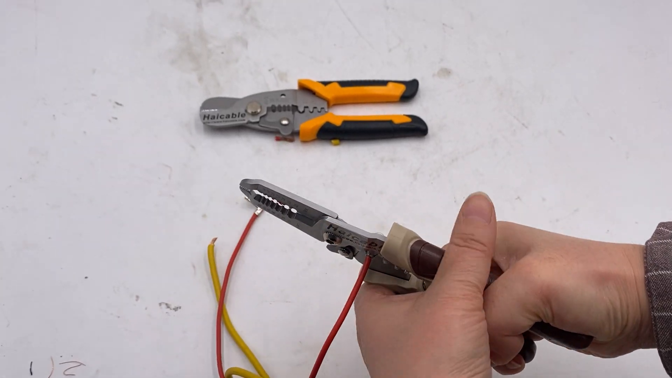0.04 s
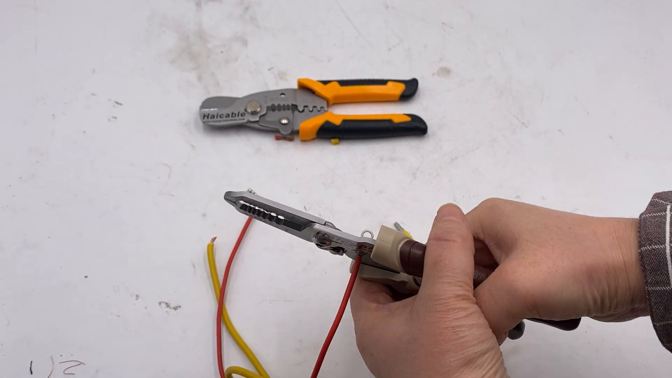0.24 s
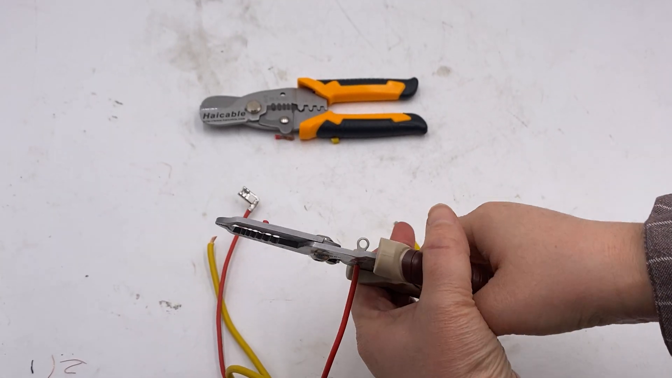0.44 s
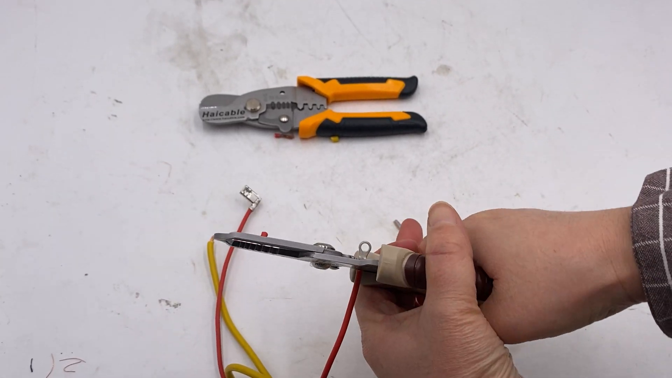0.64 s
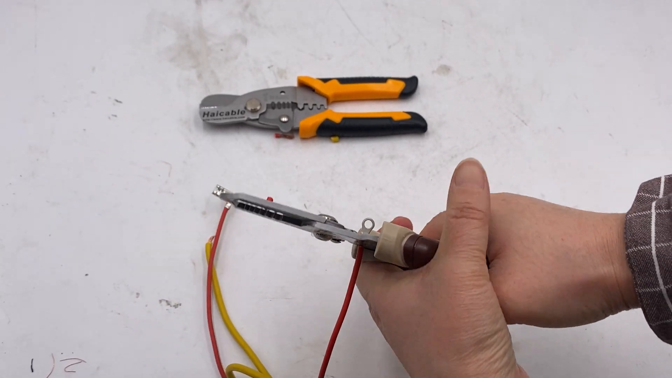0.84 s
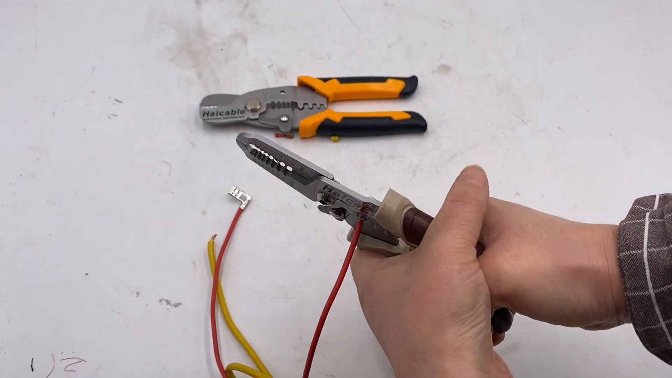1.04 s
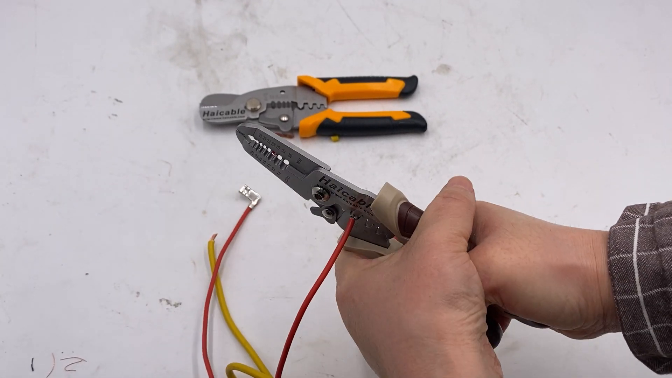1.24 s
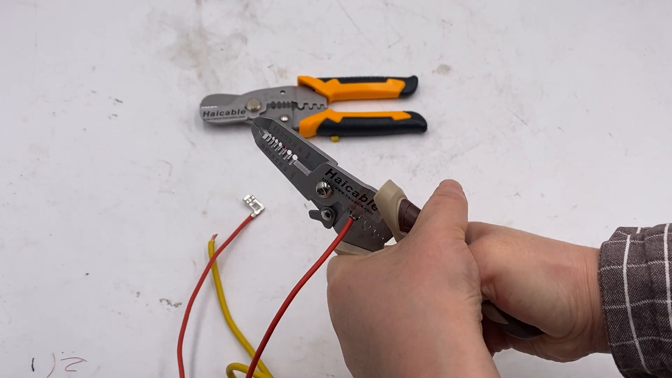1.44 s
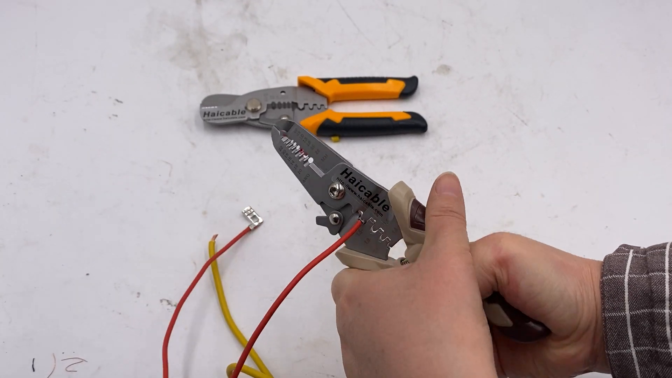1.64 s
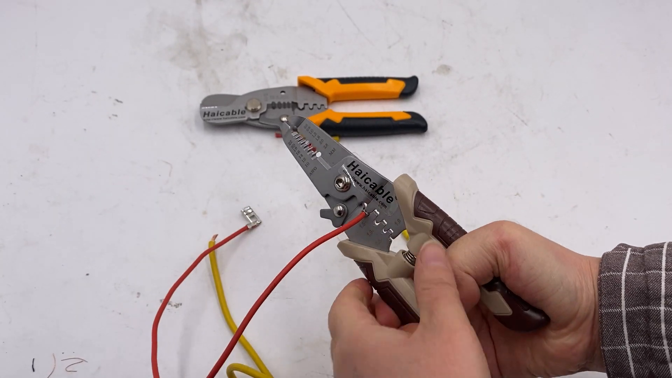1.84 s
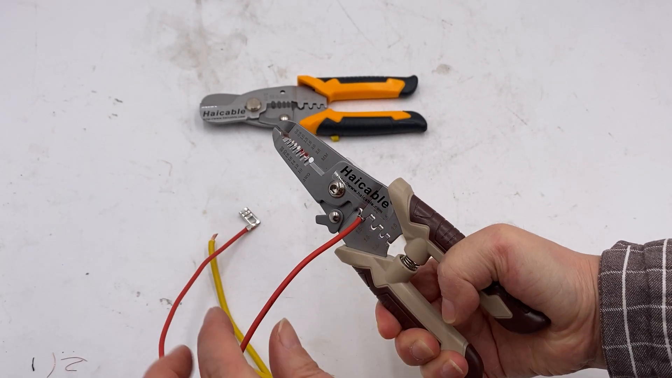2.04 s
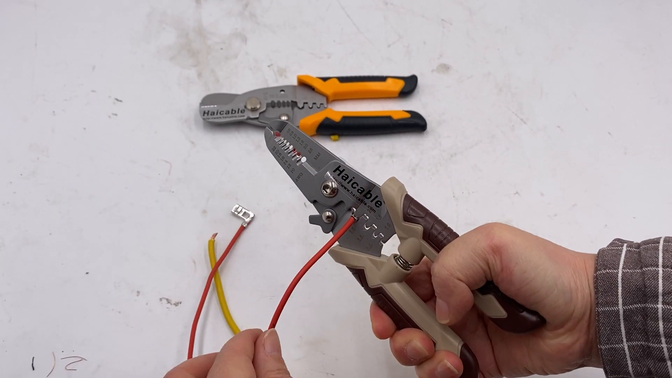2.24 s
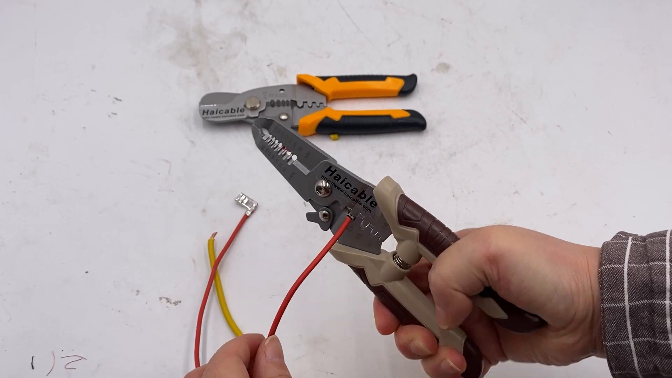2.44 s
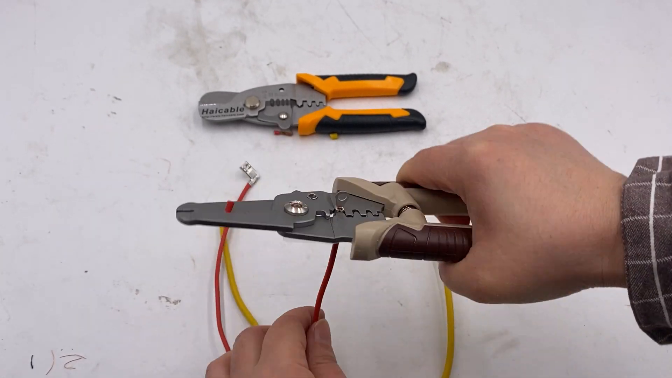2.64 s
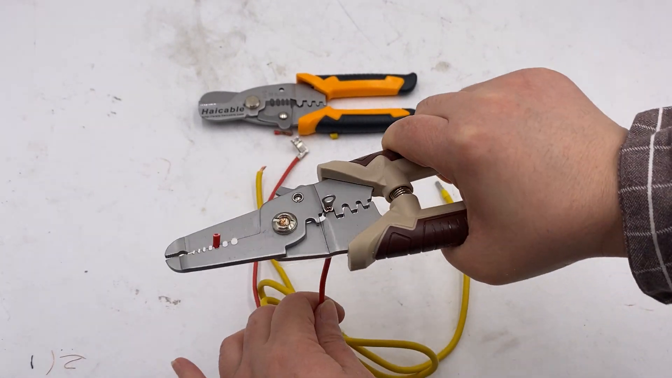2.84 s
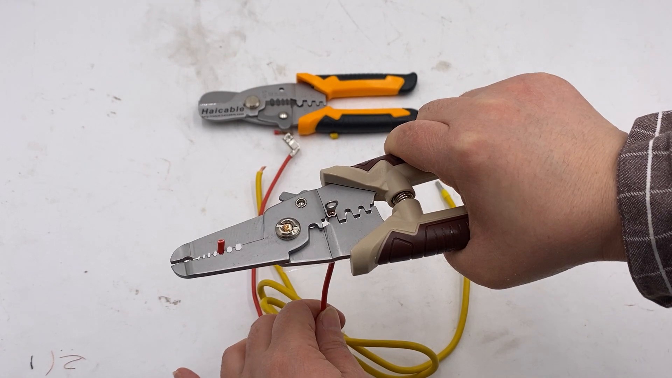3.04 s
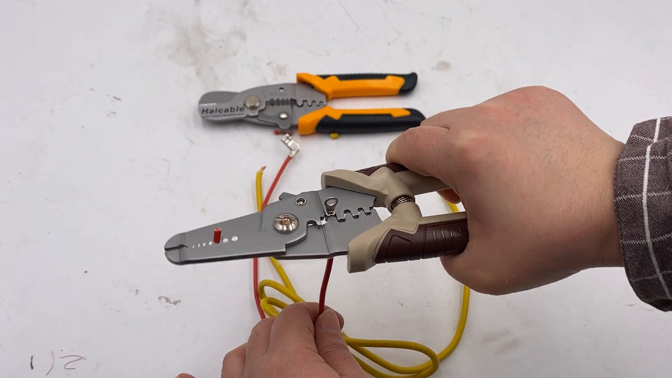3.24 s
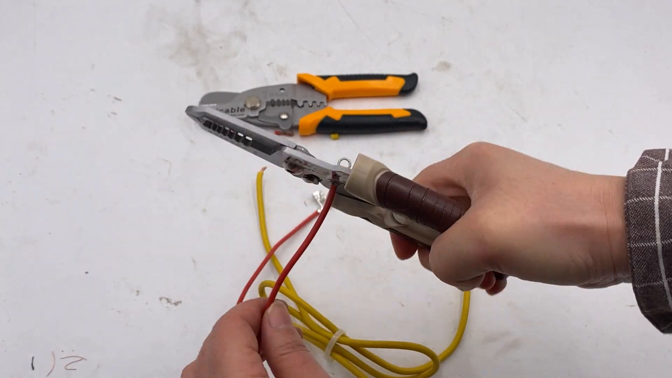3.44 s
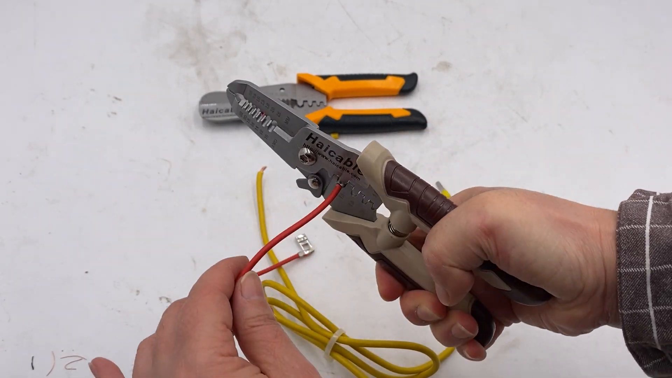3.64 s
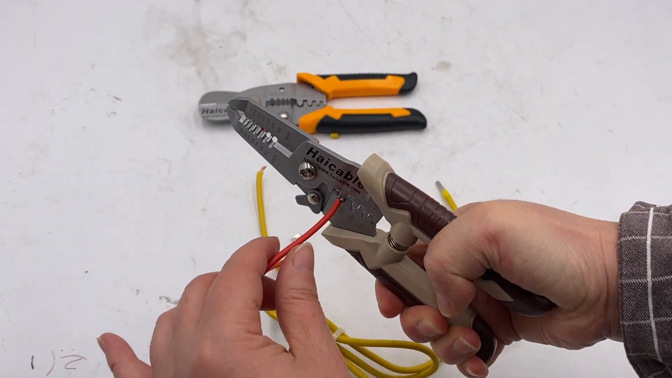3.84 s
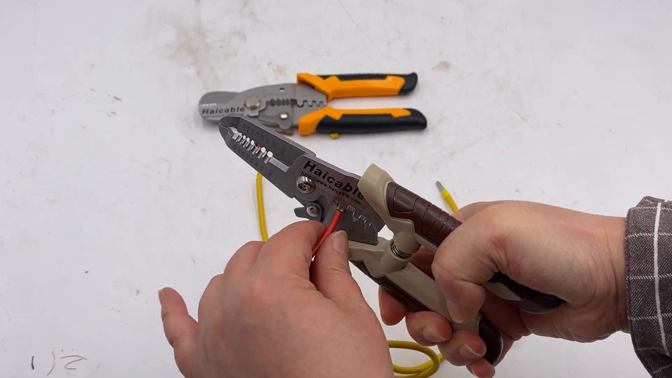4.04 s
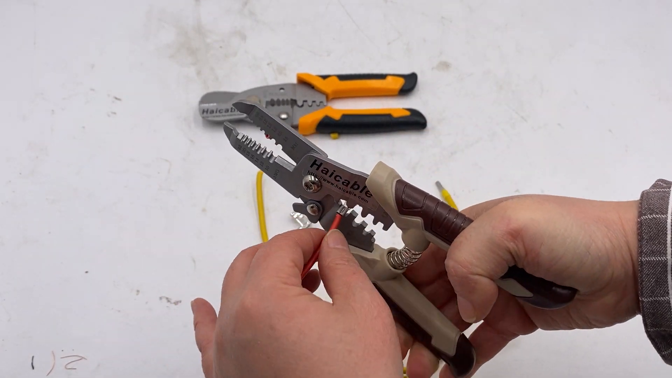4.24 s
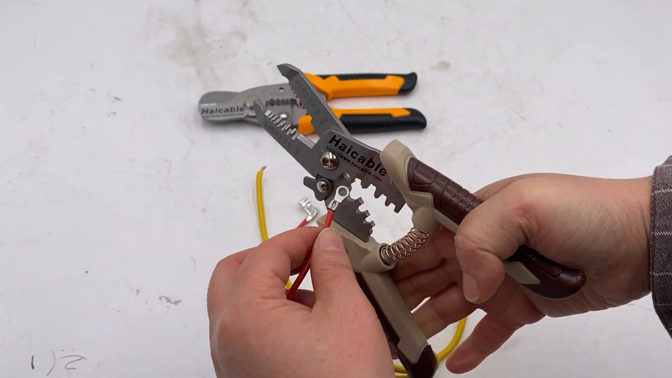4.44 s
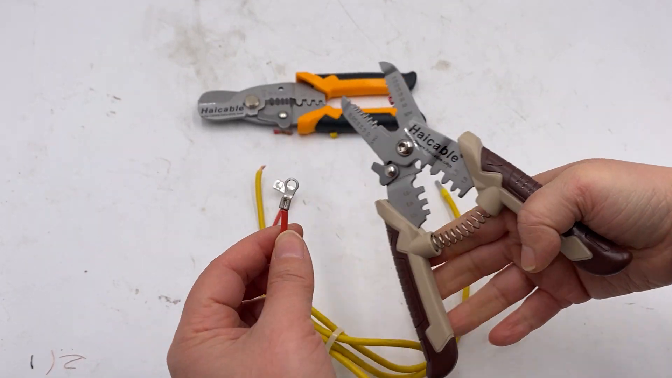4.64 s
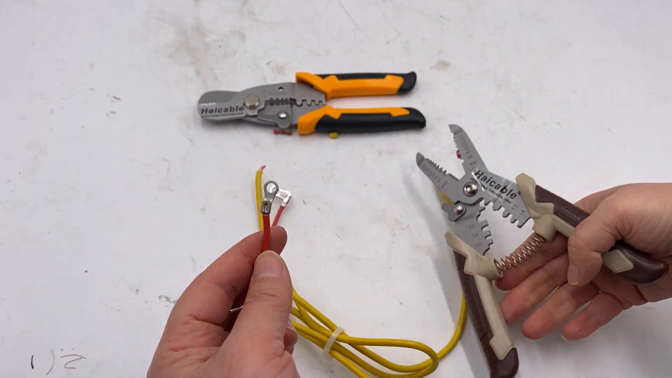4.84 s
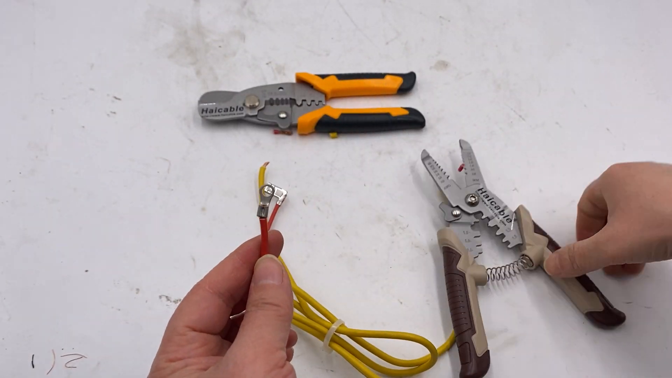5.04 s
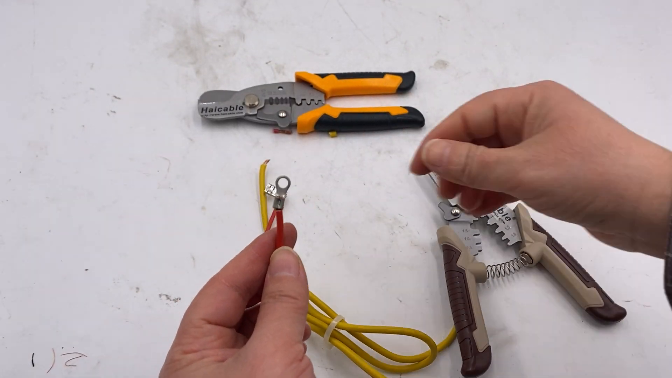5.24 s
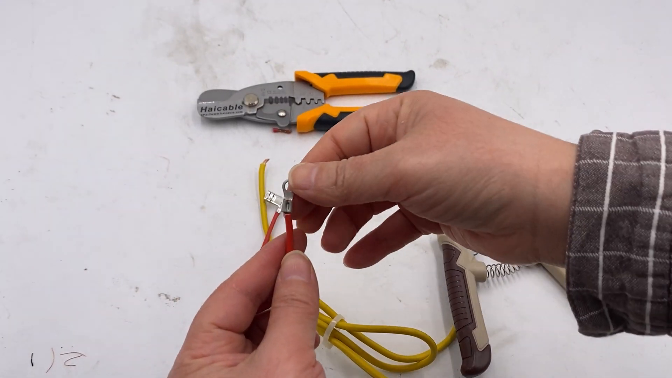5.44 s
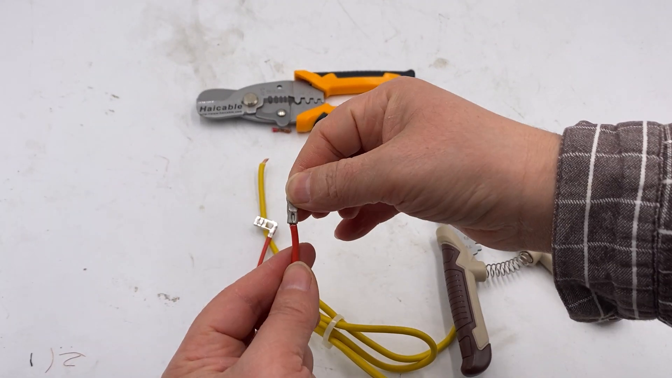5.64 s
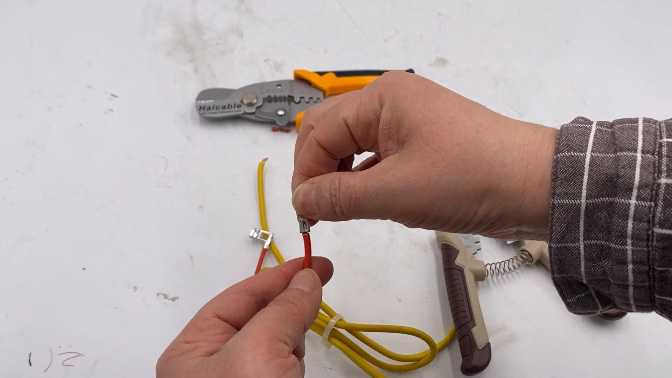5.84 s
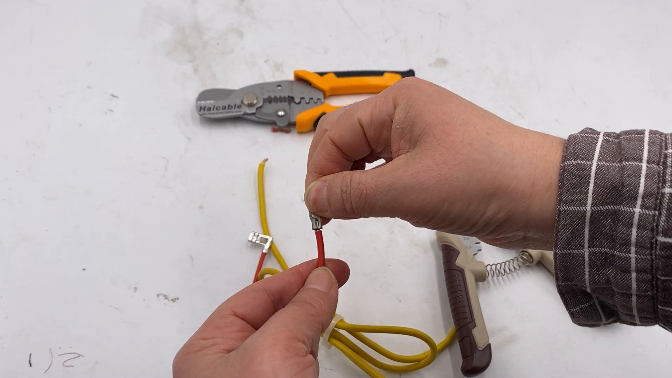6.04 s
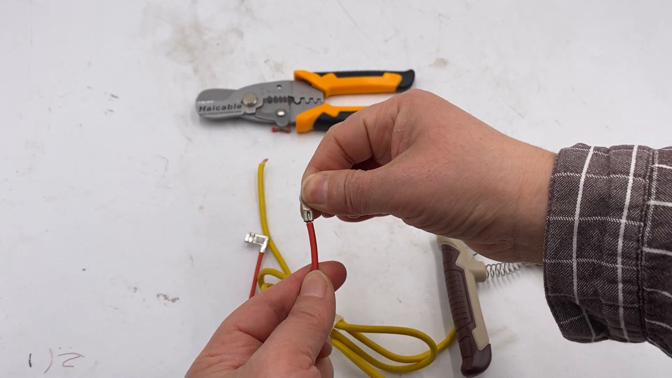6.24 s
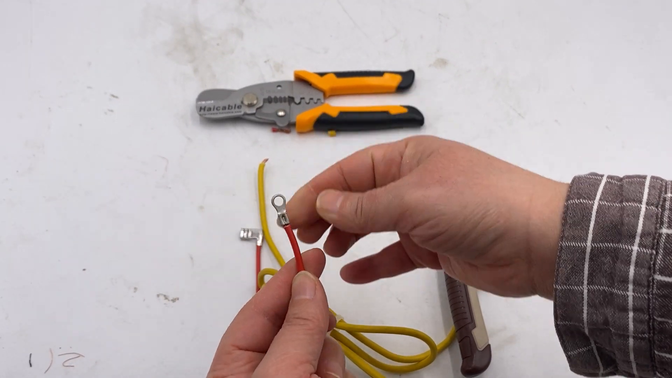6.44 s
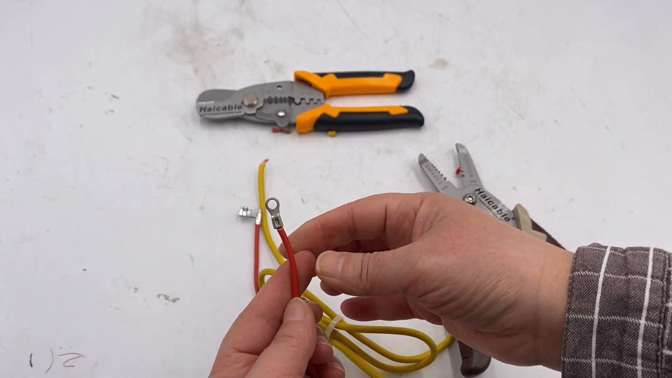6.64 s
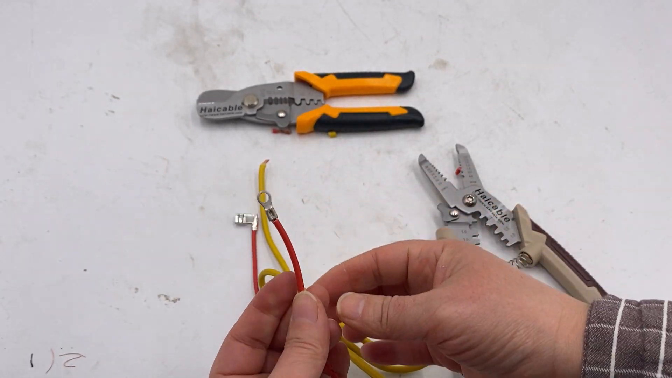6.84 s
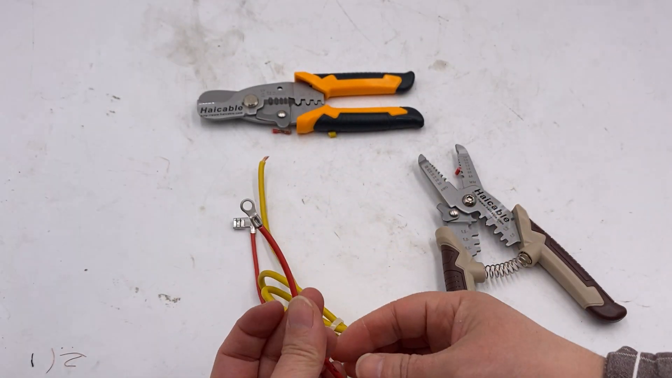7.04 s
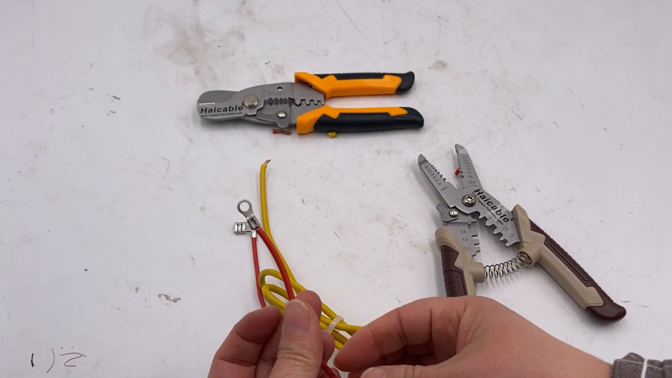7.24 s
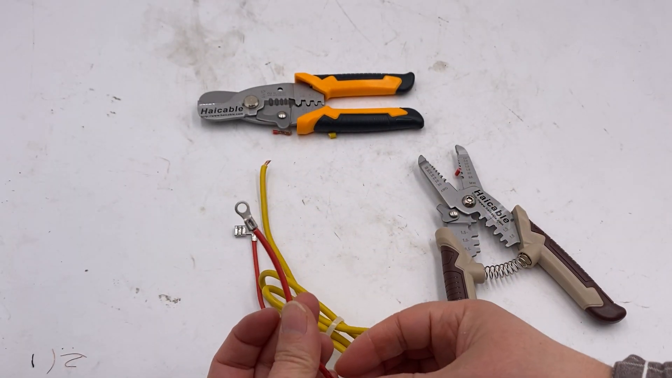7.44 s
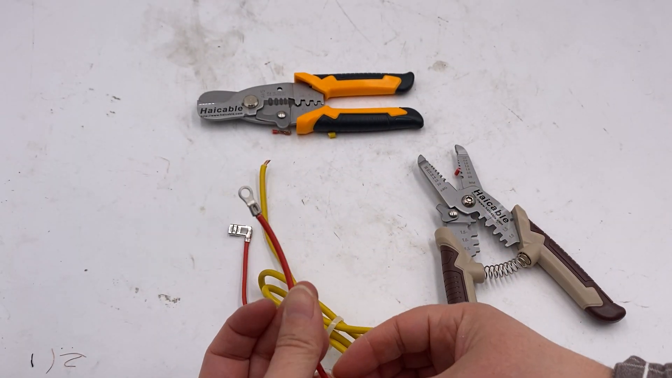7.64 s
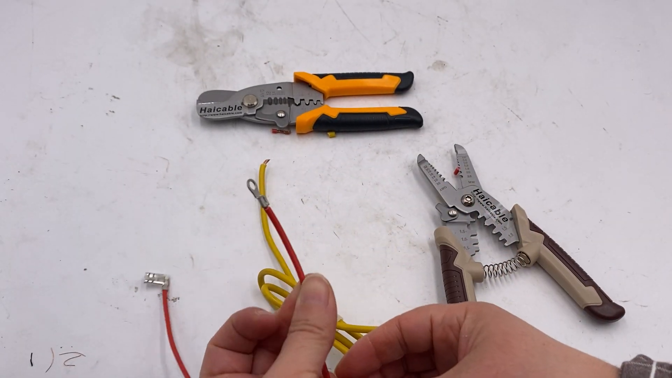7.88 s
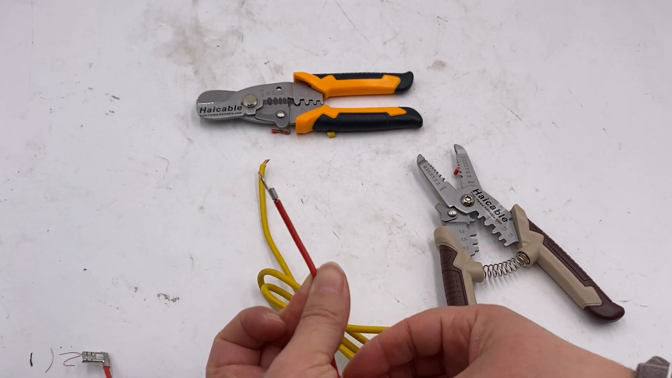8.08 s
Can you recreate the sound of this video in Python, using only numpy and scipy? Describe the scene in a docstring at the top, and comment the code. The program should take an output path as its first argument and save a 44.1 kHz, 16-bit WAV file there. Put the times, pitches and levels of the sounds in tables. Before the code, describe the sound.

A wire tool is handled close to the microphone: sparse clicks, faint sleeve hiss, squeaky stick-slip rubbing and two stronger rasps as it turns on the lead. Around the middle it hits the tabletop with woody thumps and sharp steel rattling, by far the loudest event. Afterwards come only quiet touches and ticks, then a brief dragging scrape of the lead, over a constant dull air rumble with a short room tail.

```python
"""Wire stripper over a workbench

Hands work a steel wire stripper on a lead, heard close by in a small room with rumbling ventilation.
Stick-slip friction, filtered by resonances, makes the rubbing of fingers and sleeve, the spring and the
dragged lead. Impulses through resonances and spectra tick the jaws and terminal. The dropped tool knocks,
bounces and rattles as sums of decaying modes with noisy scatter; at the end the lead is dragged away."""
import sys
import numpy as np
from scipy import signal
from scipy.fft import rfft, irfft, next_fast_len
from scipy.io import wavfile

SR = 44100
rng = np.random.default_rng(int(sys.argv[2]) if len(sys.argv) > 2 else 0)


def wrap_up_sound(samples):
    """Save the sound to the file named by the first command line argument, as 16-bit audio."""
    columns = np.atleast_2d(samples).T
    # keep every value between -1 and 1, then stretch to whole-number steps
    tamed = np.clip(columns, -1, 1)
    steps = np.round(tamed * 32767).astype(np.int16)
    wavfile.write(sys.argv[1], SR, steps)


N = 357651  # samples

# Levels in the tables are relative: each source sets its own final gain.
# ventilation spectrum: f/Hz, density level/dB
VENT_SPECTRUM = [(20, -47.5), (46, -2), (77, -9), (113, -5.5), (154, -16), (285, -13.5), (400, -21),
                 (800, -26), (1370, -37.5), (2320, -45), (3500, -53), (14000, -59), (16000, -80.5)]
# stereo width of the field: f/Hz, side over mid level/dB
STEREO_WIDTH = [(60, -18), (120, -18), (220, -7.5), (600, 0.5), (1300, -1.5), (2400, -6.5), (4400, 1),
                (7500, -4), (9200, 24.5), (11000, -13.5), (15000, 5.5)]
# decay of the room's tail: f/Hz, t60/s
ROOM_DECAY = [(100, 0.77), (500, 0.35), (3000, 0.24), (12000, 0.13)]
# fingers shifting on the grips: start t/s, length t/s, level/dB
FINGER_RUBS = [(0, 0.07, -62.5), (1.13, 0.11, -55), (1.405, 0.17, -54), (1.542, 0.069, -46),
               (1.698, 0.037, -54), (1.89, 0.038, -57.5), (1.985, 0.053, -63.5), (2.208, 0.023, -38.5),
               (2.24, 0.035, -50), (2.315, 0.086, -63), (2.452, 0.14, -49.5), (2.498, 0.015, -40),
               (2.528, 0.014, -37.5), (3.892, 0.025, -60.5), (4.36, 0.043, -47), (5.62, 0.4, -78),
               (6.435, 0.088, -54), (6.555, 0.051, -64), (6.865, 0.083, -57), (7.255, 0.054, -61.5)]
# soft hiss strokes (sleeve swishes, the hiss of a strong rub, the fading of a bright tick):
# start t/s, length t/s, level/dB
SOFT_HISSES = [(.66, 0.11, -74.5), (.86, 0.099, -74.5), (1.42, 0.68, -77.5), (2.21, .03, -56),
               (2.868, 0.06, -60.5), (4.31, 0.19, -70), (6.555, .05, -69), (6.65, 0.088, -68),
               (6.86, 0.112, -70)]
# three long slides (tool twisted round the lead, twisted back, hands drawing the lead away),
# each a list of: t/s, rasp level/dB, hiss level/dB
LONG_SLIDES = [
    [(2.655, -58.5, -59), (2.671, -50.5, -60.5), (2.693, -39.5, -51.5), (2.723, -39.5, -54),
     (2.737, -65, -53.5), (2.773, -46.5, -55), (2.805, -54.5, -55), (2.865, -65.5, -76)],
    [(3.43, -63.5, -72), (3.44, -45.5, -52.5), (3.512, -38, -45.5), (3.544, -34, -46), (3.582, -46, -58.5),
     (3.626, -46.5, -56.5), (3.7, -83, -86.5)],
    [(7.61, -69.5, -87), (7.728, -58.5, -73.5), (7.742, -47, -64), (7.81, -47, -50.5), (7.832, -37, -48.5),
     (8.01, -62, -49.5), (8.04, -75, -64), (8.064, -51.5, -60.5), (8.11, -61.5, -72)],
]
# resonances of the rubbed tool: f/Hz, width f/Hz, level/dB
GRIP_RESONANCES = [(1465, 160, -18.5), (1854, 81, -10), (2243, 125, 2), (2367, 250, -2.5), (2675, 110, -8),
                   (3015, 460, -17.5)]
# friction hiss spectrum: f/Hz, density level/dB
HISS_SPECTRUM = [(300, -36), (800, -7), (1400, -5.5), (2200, -3.5), (4000, 2.5), (7000, -1), (9300, -6),
                 (11000, -7), (14000, -7.5), (15500, -30)]
# dull clicks of the grips in the hand: t/s, level/dB
GRIP_CLICKS = [(.1211, -27), (1.0006, -22.5), (1.5482, -30), (1.7025, -37.5), (1.8003, -40.5),
               (2.2144, -21.5), (2.6249, -20), (2.6484, -22.5), (3.4394, -20), (3.787, -42), (4.3635, -30),
               (5.657, -45), (6.3539, -25), (6.7181, -36), (6.8284, -31.5)]
# bright ticks of jaws and terminal: t/s, level/dB
BRIGHT_TICKS = [(.2775, -58), (.365, -53), (.3785, -41.5), (.414, -53), (.4479, -55), (.8604, -50),
                (2.5795, -48.5), (2.875, -34.5), (4.244, -58), (4.265, -56.5), (5.3902, -51.5), (5.53, -65),
                (6.3539, -37.5)]
# lead sliding over the bench: start t/s, length t/s, level/dB
LEAD_DRAGS = [(2.68, 0.051, -46.5), (3.497, .05, -44.5), (4.364, 0.031, -54.5), (6.35, 0.028, -51),
              (6.56, 0.029, -61), (6.655, 0.08, -65), (7.83, 0.16, -41), (7.955, 0.076, -35.5)]
# resonances of the dragged lead: f/Hz, width f/Hz, level/dB
SCRAPE_RESONANCES = [(3600, 290, 2.5), (4440, 550, -9.5)]
# modes of the terminal's tap: f/Hz, level/dB, t60/s
TERMINAL_MODES = [(730, -43, 0.026), (1076, -39.5, 0.017), (1660, -47, 0.037), (2820, -44.5, .014)]
# modes of the lead's freed end: f/Hz, level/dB, t60/s
PLUCK_MODES = [(510, -39.5, .055), (2656, -45, 0.14)]
# coil spring sliding as the jaws open: start t/s, length t/s, level/dB
JAW_OPENINGS = [(4.59, .22, -73)]
# resonance of the coil: f/Hz, width f/Hz, level/dB
COIL_RESONANCE = [(2620, 440, 0)]
# steel contacts of the bouncing tool, each on another part:
# t/s, crack level/dB, ping of that part f/Hz, ping level/dB
STEEL_CLASHES = [(4.9316, -28.5, 2520, -49.5), (4.9447, -24.5, 4980, -34), (4.9905, -44, 5150, -46.5),
                 (5.061, -24, 6070, -41.5), (5.097, -15, 3085, -30), (5.1095, -16, 12960, -27.5),
                 (5.148, -29.5, 6000, -38), (5.1998, -19, 2720, -32), (5.2166, -24.5, 5740, -26),
                 (5.2667, -39, 5050, -43.5), (5.2793, -30, 5570, -42), (5.303, -25.5, 4100, -42),
                 (5.327, -35, 3580, -46.5)]
# steel contact spectrum: f/Hz, density level/dB
STEEL_SPECTRUM = [(300, -14.5), (1300, -3), (2800, 2), (6000, -1), (7500, -7.5), (10500, -11),
                  (13500, -11.5), (16000, -20.5)]
# modes of the steel jaws: f/Hz, level/dB, t60/s
JAW_MODES = [(2120, 2.5, 0.064), (3058, -2, 0.076), (4107, -6, .12), (7200, -7, 0.18), (12510, -11.5, .1)]
# blows on the bench: t/s, thump level/dB, clack level/dB
BENCH_KNOCKS = [(4.945, -19.5, -39), (5.062, -25.5, -53), (5.0986, -12.5, -14), (5.1102, -25.5, -15),
                (5.203, -16, -18.5), (5.286, -21, -42), (5.307, -21, -29), (5.4, -37.5, -59.5)]
# modes of the bench top: f/Hz, level/dB, t60/s
BENCH_MODES = [(67, 5, 0.1), (102, 1.5, 0.12), (123, 2.5, 0.21), (187, -3, 0.099), (262.4, -7, 0.17),
               (294, -7.5, 0.15), (343.8, -10.5, 0.12), (433, -11, 0.16), (670, -3, 0.11),
               (743.6, 5, 0.042), (842, 7, 0.044), (909, 2.5, 0.1), (996, -3.5, 0.11), (1195, -15, 0.07),
               (1365, -15.5, 0.05), (1620, -8, 0.04)]

TOP_HZ = 15950
VENT_LEFT_DB = 0.33  # left raised and right lowered by this
# where in its length a stroke crests; how far below the crest its nominal start and end lie
CREST_SHARE, STROKE_EDGE_DB = 0.46, 14
RUB_HISS_DB = -16.5  # hiss gain of a finger relative to its rasp gain
SLIDE_RASP_DB, SLIDE_HISS_DB = 1.5, 2
GRIP_EDGE_DB, STEEL_BODY_DB = -22, -7.5  # treble of a grip click; how much a steel tick rings the grips
CRUNCH_T60_S = 0.016  # a light contact grinds on for a moment
TAP_S, FLICK_S = 7.658, 8.05  # the terminal taps the bench; the lead's end springs free
PING_T60_S, PING_SPLIT = 0.016, 0.027  # each ping is a close pair of modes, this share apart
CHATTER_S, CHATTER_DB = 0.007, -4  # loose parts strike again within this time, this much softer


def amp(db):
    """Level law: decibels to amplitude ratio."""
    return 10 ** (np.asarray(db) / 20)


def unit(x):
    """Normalisation of power: scale to rms 1."""
    return x / np.sqrt(np.mean(x ** 2) + 1e-20)


def along(points, hz):
    """Interpolation of (f/Hz, value) points on a logarithmic frequency axis."""
    f, v = np.transpose(points)
    return np.interp(np.log(hz + 1), np.log(f + 1), v)


def add(track, s, sound):
    """Superposition: mix a sound into a track at time s."""
    part = track[..., round(s * SR):][..., :sound.shape[-1]]
    part += sound[..., :part.shape[-1]]


def filtered(x, response):
    """Linear filtering: the spectrum of x times a complex response of frequency."""
    size = next_fast_len(N + SR // 2, real=True)
    hz = np.fft.rfftfreq(size, 1 / SR)
    return irfft(rfft(x, size) * response(hz), size)[..., :N]


def colour(points):
    """Minimum phase: folding the cepstrum gives a causal response of unit power with this spectrum."""
    def response(hz):
        cepstrum = irfft(np.log(amp(along(points, hz))))
        half = len(cepstrum) // 2
        cepstrum[1:half] *= 2
        cepstrum[half + 1:] = 0
        h = np.exp(rfft(cepstrum))
        return h / np.sqrt(np.mean(abs(h) ** 2))
    return response


def resonances(modes):
    """Damped resonators in parallel, alternating in sign, scaled to unit power."""
    def response(f):
        h = 0
        for k, (centre, width, db) in enumerate(modes):
            damping = 1j * f * width
            h = h + (-1) ** k * amp(db) * damping / (centre ** 2 - f ** 2 + damping)
        return h / np.sqrt(np.mean(abs(h) ** 2))
    return response


def ringing(modes):
    """Modal decay: struck (f/Hz, level/dB, t60/s) modes die away exponentially."""
    t = np.arange(SR // 4) / SR
    return sum(amp(db - 60 * t / t60) * np.sin(2 * np.pi * hz * t) for hz, db, t60 in modes)


def stereo_noise():
    """Partial coherence: white noise in two channels, split into mid and side by frequency."""
    def share(hz):
        turn = np.arctan(amp(along(STEREO_WIDTH, hz)))
        return np.array([np.cos(turn), np.sin(turn)])
    mid, side = filtered(rng.standard_normal((2, N)), share)
    return np.array([mid + side, mid - side])


def slips(rate, spread_db, clump_db):
    """Stick-slip friction: catches of random size, loudness varying in clumps, rms 1."""
    sizes = spread_db * np.clip(rng.standard_normal(N), -2, 2)
    knots = np.arange(0, N, 256)
    pressure = np.interp(np.arange(N), knots, rng.uniform(-1, 1, len(knots)))
    caught = rng.random(N) < rate / SR
    return unit(caught * amp(sizes + clump_db * pressure) * rng.choice([-1, 1], N))


def strokes(rows):
    """Friction envelope: gain of strokes that swell to a crest and let go, summed in power."""
    power = np.zeros(N)
    for s, length, db in rows:
        first, last = round((s - length) * SR), round((s + 2 * length) * SR)
        i = np.arange(max(0, first), min(N, last))
        past_crest = (i / SR - s) / length - CREST_SHARE
        away = np.where(past_crest < 0, past_crest / CREST_SHARE, past_crest / (1 - CREST_SHARE))
        power[i] += amp(db - STROKE_EDGE_DB * away ** 2) ** 2
    return np.sqrt(power)


def slides(axis):
    """Friction envelope: gain of the long slides, interpolated in level from one column."""
    t = np.arange(N) / SR
    gain = np.zeros(N)
    for slide in LONG_SLIDES:
        columns = np.transpose(slide)
        gain += amp(np.interp(t, columns[0], columns[axis], left=-np.inf, right=-np.inf))
    return gain


def taps(rows):
    """Impulsive excitation: one sample for each (t/s, level/dB) contact."""
    s, db = np.transpose(rows)
    out = np.zeros(N)
    out[np.round(s * SR).astype(int)] = amp(db)
    return out


def nearby(x, scatter_db, t60):
    """Near field: direct sound out of phase between channels, plus scatter by bench, hands and walls."""
    def phase_shift(hz):
        return np.exp(1j * np.arctan(amp(along(STEREO_WIDTH, hz))) * np.array([[-1], [1]]))
    direct = filtered(x, phase_shift)
    t = np.arange(SR // 3) / SR
    echoes = stereo_noise()[:, :len(t)] * amp(-60 * t / t60)
    echoes /= np.linalg.norm(echoes[0])
    return direct + amp(scatter_db) * signal.fftconvolve(x[None], echoes, axes=1)[:, :N]


def ventilation():
    """Stationary broadband noise: a low rumble with a trace of hiss, a little to the left."""
    balance = amp([[VENT_LEFT_DB], [-VENT_LEFT_DB]])
    return amp(-53.5) * balance * unit(filtered(stereo_noise(), colour(VENT_SPECTRUM)))


def rubbing():
    """Stick-slip friction: a rasp in the tool's resonances and a finer hiss above."""
    fingers = strokes(FINGER_RUBS)
    rasp_gain = fingers + amp(SLIDE_RASP_DB) * slides(axis=1)
    soft_gain = np.hypot(amp(RUB_HISS_DB) * fingers, strokes(SOFT_HISSES))
    hiss_gain = soft_gain + amp(SLIDE_HISS_DB) * slides(axis=2)
    catches = slips(rate=1100, spread_db=3.0, clump_db=4.5)
    rasp = filtered(catches * rasp_gain, resonances(GRIP_RESONANCES))
    # the hiss shares the rasp's catches and adds denser ones
    fine_catches = unit(1.9 * catches + slips(rate=3600, spread_db=3.5, clump_db=5.5))
    hiss = amp(2.5) * filtered(fine_catches * hiss_gain, colour(HISS_SPECTRUM))
    return nearby(rasp + hiss, scatter_db=-2, t60=0.08)


def room(x):
    """Reverberation: a diffuse tail in which each frequency decays at its own rate."""
    hz, t, z = signal.stft(rng.standard_normal((2, SR)), SR, nperseg=256)
    decay = amp(-60 * t / along(ROOM_DECAY, hz)[:, None])
    mid, side = signal.istft(z * decay, SR, nperseg=256)[1]
    # without its bass, the side leaves the low tail nearly mono
    side = signal.sosfilt(signal.butter(2, 250, "high", fs=SR, output="sos"), side)
    tail = np.array([mid + side, mid - side]) / np.linalg.norm(mid)
    return signal.fftconvolve(x, tail, axes=1)[:, :N]


def ticks():
    """Impact excitation: light contacts ring the grips and grind briefly; steel has the sharper edge."""
    grip, steel = taps(GRIP_CLICKS), taps(BRIGHT_TICKS)
    body = filtered(grip + amp(STEEL_BODY_DB) * steel, resonances(GRIP_RESONANCES))
    contacts = steel + amp(GRIP_EDGE_DB) * grip
    t = np.arange(SR // 20) / SR
    dying = amp(-60 * t / CRUNCH_T60_S)
    dying /= np.linalg.norm(dying)
    grind = signal.fftconvolve(contacts, dying)[:N] * rng.standard_normal(N)
    edge = filtered(contacts + grind, colour(HISS_SPECTRUM))
    return nearby(amp(3) * body + amp(13.0) * edge, scatter_db=0.5, t60=0.1)


def lead():
    """Friction and free vibration: the lead scrapes, its terminal taps and its end flicks free softly."""
    catches = slips(rate=940, spread_db=1.5, clump_db=4.5)
    scrape = filtered(catches * strokes(LEAD_DRAGS), resonances(SCRAPE_RESONANCES))
    knocks = np.zeros(N)
    add(knocks, TAP_S, ringing(TERMINAL_MODES))
    add(knocks, FLICK_S, ringing(PLUCK_MODES))
    return nearby(scrape, scatter_db=-5.0, t60=0.14) + knocks


def spring():
    """Friction-driven resonance: the coil spring whispers as it stretches."""
    catches = slips(rate=1200, spread_db=2, clump_db=1.5)
    whisper = filtered(catches * strokes(JAW_OPENINGS), resonances(COIL_RESONANCE))
    return nearby(whisper, scatter_db=-0.5, t60=0.11)


def rattle():
    """Impact and modal decay: each contact cracks, pings one part and rings the jaws at new strengths."""
    ring, pings, blows = np.zeros((3, N))
    for s, crack_db, ping_hz, ping_db in STEEL_CLASHES:
        jaws = [(hz, crack_db + db + rng.uniform(-7, 7), t60) for hz, db, t60 in JAW_MODES]
        add(ring, s, ringing(jaws))
        pair = [(ping_hz * (1 + side * PING_SPLIT / 2), ping_db, PING_T60_S) for side in (-1, 1)]
        add(pings, s, ringing(pair))
        add(blows, s, amp([crack_db]))
        for delay in CHATTER_S * rng.random(size=3):
            add(blows, s + delay, amp([crack_db + CHATTER_DB]))
    crack = amp(3.0) * filtered(blows, colour(STEEL_SPECTRUM))
    tones = pings + amp(-28) * ring
    return nearby(crack, scatter_db=6.5, t60=0.1) + nearby(tones, scatter_db=-10.5, t60=0.05)


def bench():
    """Plate modes: padded grips thump the low ones of the top, bare steel clacks its high ones."""
    t, out = np.arange(SR // 2) / SR, np.zeros((2, N))
    hz, db, t60 = np.transpose(BENCH_MODES)[:, :, None]
    hard = np.interp(hz, [440, 640], [0, 1])  # from thump to clack
    # slow bending waves make the low modes swell late
    swell = 1 - np.exp(-(t / (0.013 * (100 / hz) ** 1.4)) ** 2)
    # the lowest modes align in phase after 15 ms, in one heave of the whole top
    heave = 0.015 * (hz < 160)
    # each mode is out of phase between the channels, some of the clack louder on the right
    apart = np.arctan(amp(along(STEREO_WIDTH, hz)))
    right_db = np.interp(hz, [450, 700, 1000], [0, 2.5, 0])
    for s, thump_db, clack_db in BENCH_KNOCKS:
        # the point of contact matters most to the short waves
        scatter = rng.standard_normal((2, len(hz), 1)) * np.minimum(hz / 600, 1)
        blow_db = thump_db + hard * (clack_db - thump_db)
        size = amp(db + blow_db + scatter[0] - 60 * t / t60) * swell
        phase = 2 * np.pi * hz * (t - heave) + 0.5 * scatter[1]
        channels = [np.sum(size * amp(ear * right_db) * np.sin(phase + ear * apart), 0) for ear in (-1, 1)]
        add(out, s, np.array(channels))
    return out


def scene():
    """Superposition of handling, drop, their reverberation and the ventilation."""
    handling = rubbing() + ticks() + lead() + spring()
    drop = rattle() + bench()
    tail = room(amp(-21.5) * handling + amp(-15.0) * drop)
    return ventilation() + handling + drop + tail


def record(dry):
    """Band limitation: nothing at or above the top frequency passes."""
    return filtered(dry, lambda hz: hz < TOP_HZ)


dry = scene()
out = record(dry)
wrap_up_sound(out)
```